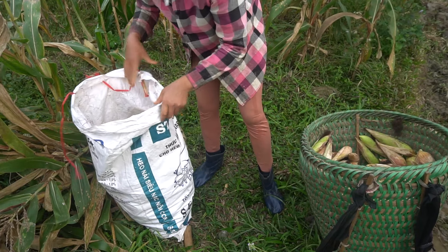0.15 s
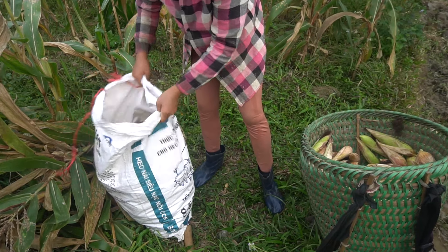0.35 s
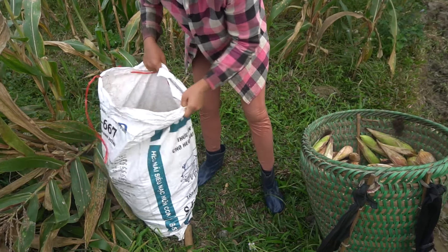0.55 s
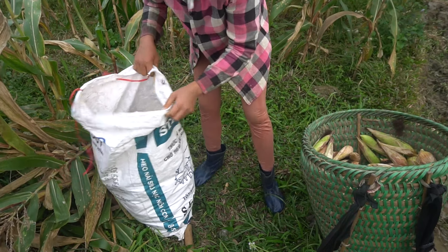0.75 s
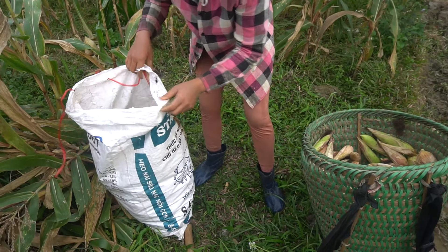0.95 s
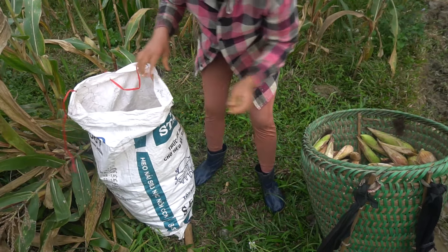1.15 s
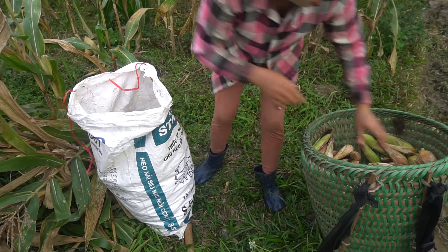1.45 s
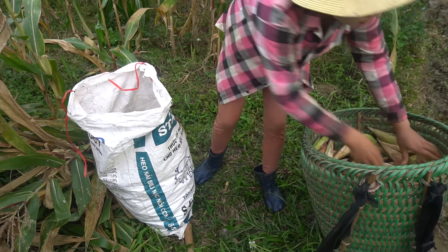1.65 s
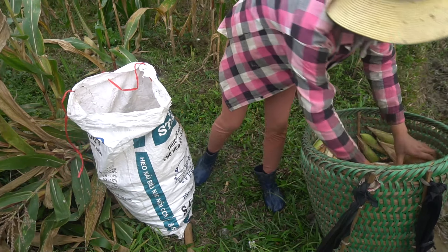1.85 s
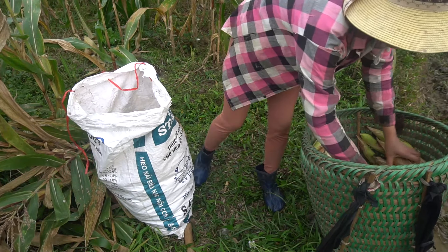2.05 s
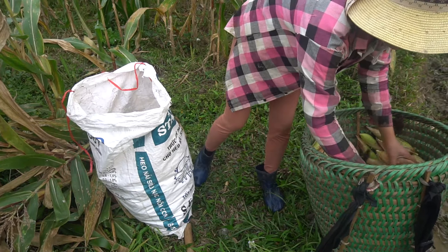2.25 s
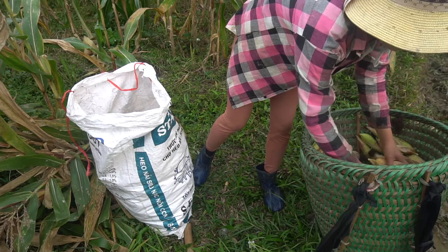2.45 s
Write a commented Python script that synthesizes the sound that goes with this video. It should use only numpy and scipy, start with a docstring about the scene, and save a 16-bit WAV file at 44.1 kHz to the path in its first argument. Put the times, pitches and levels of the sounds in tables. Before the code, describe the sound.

A stiff woven plastic sack crackles as its rim is gripped and snaps, then is jerked up with a loud crunch and bumping corn; it settles, and hands rummage softly in dry husks, close stereo microphone in a quiet field.

```python
"""Stiff woven plastic crackles as a sack of corn ears is gripped, then jerked up hard and let go.
Trains of tiny slips, coloured and level-shaped, make its folds, weave and slumping load; impulses make
its creases, rim snap and bumping ears, which with rubbing noise sound the sack's hollow. Coloured slips
rummage through dry husks in a basket to the right; ringing impulses tick in the plastic, later the husks.
Impulses thud softly on soil; noise makes the faint air and a thin band of distant insects."""
import sys
import numpy as np
from scipy import signal
from scipy.fft import rfft, irfft
from scipy.io import wavfile
from scipy.ndimage import uniform_filter1d

SR = 44100
rng = np.random.default_rng(int(sys.argv[2]) if len(sys.argv) > 2 else 0)


def file_out(sig):
    """Save sig as 16-bit WAV at sys.argv[1]."""
    # one column per channel
    cols = np.atleast_2d(sig).T
    # limit, then scale
    lim = np.clip(cols, -1, 1)
    pcm = np.round(lim * 32767).astype(np.int16)
    wavfile.write(sys.argv[1], SR, pcm)


N = 114660
T = np.arange(N) / SR  # seconds
HZ = np.fft.rfftfreq(2 * N, 1 / SR)

# All levels in the tables are relative; each layer has its own gain in the mix.
# Sack pulled taut: (time [s], crumpling folds [dB], sliding weave hiss [dB], crinkling [dB])
JERK_CURVES = [(0.24, -71, -56.5, -55), (0.286, -41, -52.5, -52), (0.32, -47.5, -55, -56),
               (0.334, -34.5, -53.5, -51.5), (0.35, -45.5, -51, -51), (0.386, -33.5, -48, -44),
               (0.402, -30.5, -37, -41), (0.418, -30, -49.5, -37), (0.428, -31, -40, -30),
               (0.448, -26.5, -38.5, -29.5), (0.472, -24.5, -33.5, -30.5), (0.498, -34.5, -39.5, -40),
               (0.512, -39, -52, -47), (0.55, -67, -63, -61)]
# Slump of the load inside: (time [s], level [dB])
SLUMP_CURVE = [(0.29, -56), (0.39, -41.5), (0.425, -38), (0.455, -46), (0.495, -29.5), (0.515, -38),
               (0.55, -59)]
# Ears bumping together inside the sack: (time [s], level [dB])
EAR_BUMPS = [(.4222, -2.5), (.4438, 3), (.4575, 3.5), (.463, 4.5), (.4738, -9), (.4795, 1.5), (.493, -4.5)]
# Resonances of the filled sack's hollow: (frequency [Hz], width [Hz], level [dB])
HOLLOW_MODES = [(154.7, 14, -0.5), (255, 9.6, -0.5), (361.5, 29.7, 4), (407, 18, -4.5), (644, 44, -13),
                (693, 40, 4), (1095, 18, -18), (1620, 28, -3.5), (1830, 36, -7), (2400, 22, -29),
                (2420, 26, -19)]
# Sharp creases of the sack popping: (time [s], level [dB])
CREASE_POPS = [(.389, -19), (.4002, -9.5), (.4222, -14), (.4228, -9), (.444, -13), (.4576, -16),
               (.4716, -27), (.4885, -24), (.500, -30), (.503, -16), (.5703, -31), (.646, -47), (.655, -43),
               (.8045, -32), (.8435, -25), (.989, -40), (1.0083, -28)]
# Hard snaps at the rim as it is gripped: (time [s], level [dB])
RIM_SNAPS = [(.2064, -13), (.2074, -19)]
# Ring of the snapped rim: (frequency [Hz], level [dB], 60 dB decay time [s])
RIM_MODES = [(1350, -12, 0.046), (1750, 3, 0.072), (2100, -2, .035), (2110, -23, 0.026), (2270, -19, .06),
             (2760, 12, .025), (2960, 6, 0.013), (4550, -2, .03), (5060, -5, 0.042), (5620, -13, .05)]
# Rim gripped: (time [s], crumpling slack folds [dB], sliding weave hiss [dB], crinkling [dB])
GRIP_CURVES = [(0.0, -44, -50, -50.5), (0.064, -58, -60, -57.5), (0.084, -70, -55, -73),
               (0.092, -54.5, -58, -67), (0.116, -67, -56.5, -55), (0.154, -52, -50.5, -47.5),
               (0.198, -47, -55, -51.5)]
# Sack settling and let go: (time [s], crumpling slack folds [dB], sliding weave hiss [dB], crinkling [dB])
SETTLE_CURVES = [(0.53, -53, -56, -46), (0.54, -57, -62, -69), (0.572, -53, -55, -46),
                 (0.646, -44.5, -53, -52), (0.652, -42.5, -48, -47), (0.704, -53, -53, -54),
                 (0.768, -53, -48.5, -48), (0.79, -49, -56, -54), (0.81, -50.5, -47.5, -40.5),
                 (0.83, -45, -52.5, -46.5), (0.912, -57, -66, -59), (0.946, -82, -65, -61),
                 (0.97, -58, -59, -59), (0.986, -61, -51, -66), (0.996, -55, -54, -57),
                 (1.006, -46, -54, -47), (1.052, -63, -61, -57), (1.066, -70, -57, -55),
                 (1.106, -69, -62.5, -71), (1.146, -52.5, -53, -46), (1.156, -73, -59, -74),
                 (1.172, -54, -59, -48), (1.19, -71, -61, -65), (1.2, -73, -67, -78)]
# Hands among the husks: (time [s], crunch [dB], hiss [dB], dull scuff of the ears [dB])
RUMMAGE_CURVES = [(1.76, -63, -62, -79), (1.83, -52.5, -61, -74), (1.84, -69, -60, -84),
                  (1.862, -51, -52, -55.5), (1.906, -50.5, -55, -58), (1.928, -55.5, -56, -53),
                  (2.022, -45, -44.5, -56.5), (2.064, -50.5, -57, -67), (2.086, -46.5, -49.5, -54.5),
                  (2.124, -55, -53, -70), (2.174, -57, -65, -72), (2.18, -59.5, -64, -70),
                  (2.316, -46, -52, -59), (2.336, -40.5, -35.5, -50.5), (2.37, -49, -57.5, -61),
                  (2.44, -49, -46, -66), (2.452, -53, -54, -64), (2.466, -50.5, -55, -79),
                  (2.48, -59.5, -64, -68), (2.564, -57, -59.5, -62), (2.584, -50.5, -48, -59),
                  (2.6, -48, -54, -63)]
# Light ticks and knocks of the sack's plastic and, later, of husks in the basket:
# (time [s], level [dB], left over right [dB], pitch [Hz])
LIGHT_TICKS = [(0.299, -30, 2, 2280), (0.304, -28, -1, 2370), (.332, -29, -3, 1700), (1.068, -40, -4, 3620),
               (1.141, -45, 1, 3280), (1.166, -35, -3, 2200), (1.171, -36, -1, 1700),
               (1.49, -34.5, 0, 1880), (1.897, -35.5, -6, 2950), (1.902, -30, -9, 2900),
               (2.087, -31.5, -9, 2900), (2.26, -37, -12, 2250), (2.32, -34, -2, 1700),
               (2.3335, -23, -6, 1850), (2.336, -36, -7, 2940), (2.3415, -21.5, -8, 1770),
               (2.3445, -29, -6, 1900)]
# Dull thuds of the sack's base and of boots on soil: (time [s], level [dB])
SOIL_THUDS = [(.595, -39), (.742, -36.5), (.862, -39), (.895, -39), (.94, -43), (.998, -37), (1.25, -60),
              (1.75, -51)]

# Spectra of the plastic sheet, slack folds, taut folds, sliding weave, crinkling, and of fingers
# slipping off the rim: (frequency [Hz], density [dB per Hz])
SLACK_COLOUR = [(40, -30), (120, -4), (200, -8.5), (330, 1.5), (480, -6), (650, -0.5), (850, -9.5),
                (1200, -9), (2000, -28), (4000, -31), (16000, -59)]
TAUT_COLOUR = [(100, -15.5), (300, -6), (520, -5), (700, 1), (950, -9), (1300, -12.5), (2000, -17.5),
               (4000, -29), (16000, -62)]
WEAVE_COLOUR = [(300, -31), (2000, -9.5), (4000, -1), (7500, -1.5), (11000, -3), (16000, -7)]
CRINKLE_COLOUR = [(200, -26), (900, -5.5), (1400, -1.5), (1800, 2), (2400, 0.5), (3200, -4.5),
                  (5000, -10.5), (8000, -15), (16000, -39)]
SLIP_COLOUR = [(1000, -35), (5000, -16), (9000, -1), (13000, -2), (16000, -2)]
# Spectra of the load, a crease and the rim snap: (frequency [Hz], density [dB per Hz])
LOAD_COLOUR = [(20, -42), (40, -20), (65, 10.5), (95, 0), (125, 13.5), (195, -23), (260, 6.5), (400, -1),
               (600, -26), (1500, -9), (16000, -91)]
CREASE_COLOUR = [(60, -20), (400, -2), (1500, 9.5), (3000, 6), (6000, -3), (10000, -6), (16000, -50)]
SNAP_COLOUR = [(60, -22), (600, -19), (1400, -16), (1850, 0.5), (2900, 2), (3700, -1), (5200, -5),
               (7000, -13), (11000, -17.5), (16000, -42)]
# Spectra of husk crunch, husk hiss, scuffing ears and a tick: (frequency [Hz], density [dB per Hz])
HUSK_COLOUR = [(100, -26), (600, -10), (1200, -3.5), (2200, 2), (3000, -0.5), (4500, -3.5), (8000, -7.5),
               (16000, -16.5)]
HUSK_HISS_COLOUR = [(500, -54), (3000, -2.5), (5500, -1), (9000, -0.5), (13000, 0.5), (16000, -4)]
SCUFF_COLOUR = [(100, -30), (300, -5), (580, -1.5), (950, -1), (1500, -14.5), (3000, -18), (16000, -52)]
TICK_COLOUR = [(100, -20), (600, 4.5), (1500, 3.5), (2800, 7.5), (4500, 5), (9000, -2), (16000, -24)]
# Spectra of a thud and of still air: (frequency [Hz], density [dB per Hz])
THUD_COLOUR = [(25, -15), (70, -12), (115, 6), (160, -7.5), (240, -2.5), (400, -22), (1500, -63),
               (16000, -102)]
AIR_COLOUR = [(12, -78), (20, -25), (60, -5.5), (146, -1.5), (198, -7), (377, -3.5), (459, -6), (513, -3.5),
              (976, -5.5), (1220, -6.5), (4940, -12), (7110, -13.5), (9670, -19), (14700, -20),
              (16000, -25)]
# Left-right likeness of sack, husks and air: (frequency [Hz], correlation [-1 to 1])
SACK_LIKENESS = [(60, 1), (290, 1), (640, 1), (1410, 0.94), (3100, 0.4), (7000, 0.47), (15000, 0.65)]
HUSK_LIKENESS = [(60, 1), (290, 1), (1400, 0.83), (3000, 0.59), (7000, 0.49), (15000, 0.35)]
AIR_LIKENESS = [(30, 1), (130, 0.81), (290, .2), (640, -0.35), (1400, -0.19), (3000, -0.032), (15000, 0.29)]

SACK_LEAD_US, BASKET_LEAD_US = 16, -52  # how much earlier the left channel hears it
SACK_PAN_DB, RIM_PAN_DB, BASKET_PAN_DB = 0.9, 0.79, -8.5  # left over right
SLIP_S, SLIP_LENGTH_S, SLIP_DB = 0.983, 0.016, -48  # fingers slip off the rim: middle, length, level
TICK_WIDTH_HZ, TICK_RING_DB = 370, 11.5
AIR_DB = -51.03
INSECT_HZ, INSECT_WIDTH_HZ, INSECT_DB = 6900, 370, -65
EDGE_HZ = 15900


def amp(db):
    """Decibels to gain."""
    return 10 ** (np.asarray(db) / 20)


def evened(x):
    """Scales to rms 1."""
    return x / np.sqrt(np.mean(x ** 2) + 1e-20)


def read(points):
    """Reads a table over log frequency at every bin."""
    f, value = np.transpose(points)
    return np.interp(np.log(HZ + 1), np.log(f + 1), value)


def level(rows, column):
    """One dB column of a gesture as a gain over time, falling 210 dB per second outside it."""
    rows = np.array(rows)
    start, end = rows[0, 0], rows[-1, 0]
    outside = np.maximum(start - T, 0) + np.maximum(T - end, 0)
    return amp(np.interp(T, rows[:, 0], rows[:, column]) - 210 * outside)


def through(x, response):
    """Filters by a frequency response."""
    return irfft(rfft(x, 2 * N) * response)[..., :N]


def colour(points):
    """Causal, minimum-phase response with the given spectrum and energy 1."""
    log_gain = np.log(amp(read(points)))
    full = np.concatenate([log_gain, log_gain[-2:0:-1]])
    minimum_phase = np.exp(np.conj(signal.hilbert(full)))
    return minimum_phase[:N + 1] / np.sqrt(np.mean(np.exp(full) ** 2))


def pan(db):
    """Left and right gains, left over right by db."""
    return amp(np.array([[db], [-db]]) / 2)


def stereo(pair, likeness, lead_us):
    """Blends two unrelated signals into partly alike channels, the right one delayed."""
    angle = np.arccos(np.clip(read(likeness), -1, 1)) / 2
    mid = through(pair[0], np.cos(angle))
    side = through(pair[1], np.sin(angle))
    delay = np.exp(-2j * np.pi * HZ * lead_us / 10 ** 6)
    return np.array([mid + side, through(mid - side, delay)])


def scatter(x, t60, wet_db):
    """Adds a short diffuse ring of decaying noise, different in each channel."""
    t = T[:SR // 5]
    tail = rng.standard_normal((2, len(t))) * amp(-60 * t / t60)
    tail *= 1 - np.exp(-t / 0.003)  # soft onset
    tail /= np.linalg.norm(tail, axis=1, keepdims=True)
    wet = signal.oaconvolve(x * np.ones((2, 1)), tail, axes=1)[:, :N]
    return x + amp(wet_db) * wet


def crackle(per_s, spread_db, clump_db):
    """Tiny slips of uneven, clumped size; both trains share times and sizes but not signs."""
    clumps = evened(uniform_filter1d(rng.standard_normal(N), size=260))
    spread = np.minimum(rng.exponential(1, N), 4)
    sizes = amp(spread_db * spread + clump_db * clumps)
    happens = rng.random(N) < per_s / SR
    signs = rng.choice([-1., 1.], (2, N))
    return evened(sizes * happens * signs)


def clicks(rows):
    """One impulse for each (time [s], level [dB]) row."""
    out = np.zeros(N)
    for s, db in rows:
        out[round(s * SR)] += amp(db)
    return out


def plastic(slips, gain, spectrum):
    """Stick-slip of the sack's sheet, coloured and shaped by a gain over time."""
    sheet = stereo(through(slips, colour(spectrum)), SACK_LIKENESS, SACK_LEAD_US)
    return evened(sheet) * gain * pan(SACK_PAN_DB)


def handling():
    """Slack folds crumple and crinkle and the weave slides as the rim is gripped and let go."""
    fold_gain, weave_gain, crinkle_gain = (
        level(GRIP_CURVES, column) + level(SETTLE_CURVES, column) for column in (1, 2, 3))
    slip_gain = np.exp(-((T - SLIP_S) / SLIP_LENGTH_S) ** 2)
    folds = plastic(crackle(per_s=3500, spread_db=3.0, clump_db=2.7), fold_gain, SLACK_COLOUR)
    weave = plastic(crackle(per_s=6000, spread_db=1.0, clump_db=1.7), weave_gain, WEAVE_COLOUR)
    crinkle = plastic(crackle(per_s=3000, spread_db=3.0, clump_db=1.84), crinkle_gain, CRINKLE_COLOUR)
    fingers = plastic(crackle(per_s=2800, spread_db=3.5, clump_db=-1.0), slip_gain, SLIP_COLOUR)
    return amp(1.56) * folds + amp(3.2) * weave + amp(-0.7) * crinkle + amp(SLIP_DB) * fingers


def jerk():
    """The sheet pulls taut as the ears slump, rub and bump together, sounding the sack's hollow."""
    fold_gain = level(JERK_CURVES, column=1)
    folds = plastic(crackle(per_s=2600, spread_db=2.5, clump_db=-0.8), fold_gain, TAUT_COLOUR)
    weave = plastic(crackle(per_s=4500, spread_db=-0.5, clump_db=2.0),
                    level(JERK_CURVES, column=2), WEAVE_COLOUR)
    crinkle = plastic(crackle(per_s=2500, spread_db=2.5, clump_db=-0.1),
                      level(JERK_CURVES, column=3), CRINKLE_COLOUR)
    sheet = amp(-4.5) * folds + amp(3.35) * weave + amp(1.5) * crinkle

    load_slips = through(crackle(per_s=2100, spread_db=1.5, clump_db=-3.8), colour(LOAD_COLOUR))
    load = evened(stereo(load_slips, SACK_LIKENESS, SACK_LEAD_US)) * level(SLUMP_CURVE, column=1)

    bumps = clicks(EAR_BUMPS)
    pushes = through(bumps, colour(LOAD_COLOUR))
    rubbing = rng.standard_normal(N) * fold_gain
    ring = sum(amp(db) * np.exp(-np.pi * width * T) * np.cos(2 * np.pi * hz * T)
               for hz, width, db in HOLLOW_MODES)
    hollow = through(bumps + amp(-8.5) * rubbing, rfft(ring, 2 * N))
    return sheet + amp(-2.5) * load + amp(-35.5) * hollow + amp(-11.5) * pushes


def snaps():
    """Creases pop through, and the rim snaps with brief buckling bursts and a short modal ring."""
    pops = through(clicks(CREASE_POPS), colour(CREASE_COLOUR))
    creases = scatter(pops, t60=0.029, wet_db=-4.5)
    buckling = scatter(clicks(RIM_SNAPS), t60=0.0046, wet_db=-2.5)
    rim = scatter(through(buckling, colour(SNAP_COLOUR)), t60=0.056, wet_db=-4.5)
    ring = sum(amp(db - 60 * T / t60) * np.sin(2 * np.pi * hz * T) for hz, db, t60 in RIM_MODES)
    ringing = through(clicks(RIM_SNAPS[:1]), rfft(ring, 2 * N))  # only the first snap rings
    return amp(2) * creases * pan(SACK_PAN_DB) + amp(7) * rim * pan(RIM_PAN_DB) + amp(-24.5) * ringing


def husks():
    """Dry husks crunch and slide against each other in the basket while the ears scuff dully."""
    crunch = through(crackle(per_s=4000, spread_db=-0.5, clump_db=1.0), colour(HUSK_COLOUR))
    hiss = through(crackle(per_s=7000, spread_db=-1.0, clump_db=0.5), colour(HUSK_HISS_COLOUR))
    scuff = through(crackle(per_s=2300, spread_db=2.0, clump_db=3.5), colour(SCUFF_COLOUR))
    rustle = crunch * level(RUMMAGE_CURVES, column=1)
    rustle += amp(2.5) * hiss * level(RUMMAGE_CURVES, column=2)
    rustle += amp(-1.5) * scuff * level(RUMMAGE_CURVES, column=3)
    basket = stereo(rustle, HUSK_LIKENESS, BASKET_LEAD_US)
    return scatter(basket, t60=0.026, wet_db=-12.5) * pan(BASKET_PAN_DB)


def ticks():
    """Plastic and, later, husks tick lightly: impulses with a brief resonance and a splintery tail."""
    ringing = np.zeros((2, N))
    for s, db, pan_db, hz in LIGHT_TICKS:
        resonance = 1 + amp(TICK_RING_DB) / (1 + 2j * (HZ - hz) / TICK_WIDTH_HZ)
        ringing += through(clicks([(s, db)]), resonance) * pan(pan_db)
    return amp(2) * scatter(through(ringing, colour(TICK_COLOUR)), t60=0.02, wet_db=-0.5)


def thuds():
    """Soft low pushes into the soil, as coloured impulses."""
    return through(clicks(SOIL_THUDS), colour(THUD_COLOUR)) * amp(15)


def field():
    """Still air as coloured noise, and distant insects as a thin band of noise."""
    air_noise = through(rng.standard_normal((2, N)), colour(AIR_COLOUR))
    air = stereo(air_noise, AIR_LIKENESS, 0)
    insect_band = np.exp(-((HZ - INSECT_HZ) / INSECT_WIDTH_HZ) ** 2)
    insects = through(rng.standard_normal((2, N)), insect_band)
    return amp(AIR_DB) * evened(air) + amp(INSECT_DB) * evened(insects)


def scene():
    """Sack, basket and field together."""
    sack = handling() + jerk() + snaps()
    basket = husks()
    return sack + basket + ticks() + thuds() + field()


def record(dry):
    """Rolls off everything above the recorder's band limit."""
    lowpass = signal.firwin(511, EDGE_HZ, window=("kaiser", 9), fs=SR)
    return signal.oaconvolve(dry, lowpass[None], "same")


dry = scene()
out = record(dry)
file_out(out)
```